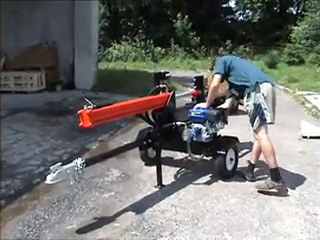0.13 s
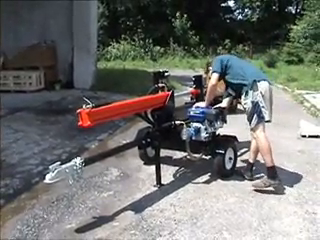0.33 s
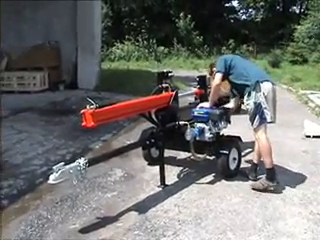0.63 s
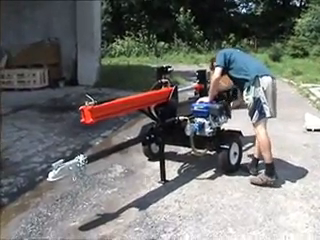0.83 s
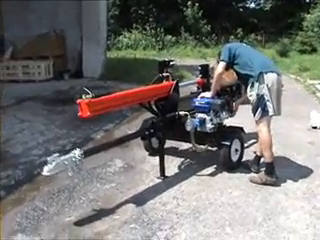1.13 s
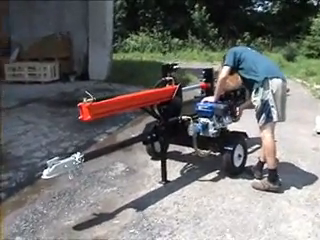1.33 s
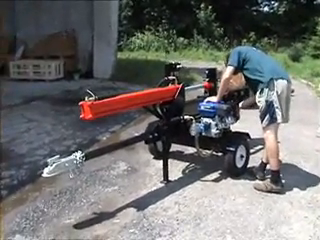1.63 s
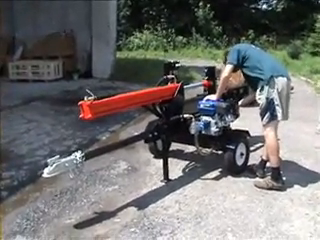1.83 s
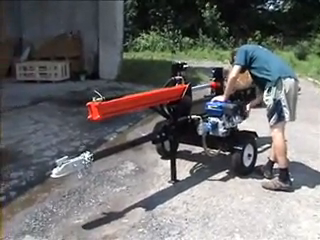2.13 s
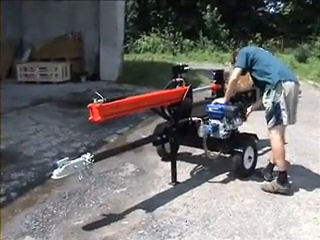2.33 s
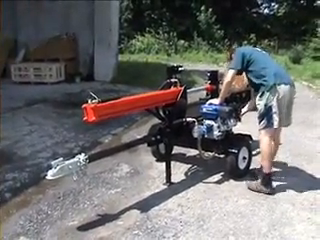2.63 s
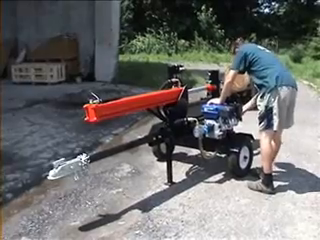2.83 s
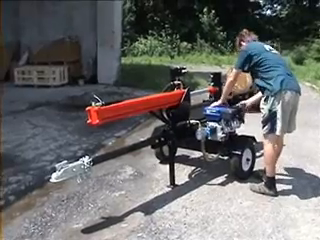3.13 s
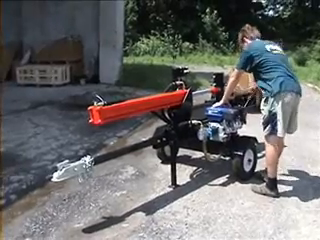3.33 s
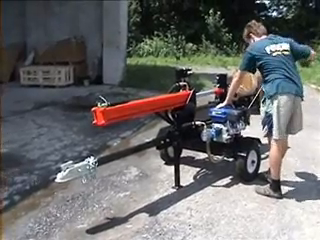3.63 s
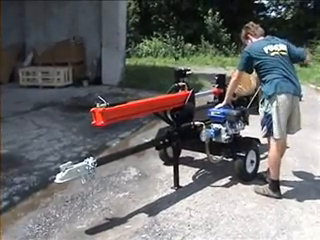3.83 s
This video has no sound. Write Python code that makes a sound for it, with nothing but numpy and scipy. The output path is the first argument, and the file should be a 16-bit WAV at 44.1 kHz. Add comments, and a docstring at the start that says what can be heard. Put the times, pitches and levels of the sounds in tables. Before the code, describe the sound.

A small petrol engine is handled with light metallic knocks while shoes crunch on gravel and birds chirp; then the starter rope is pulled, whirring and clattering. Open yard, microphone a few metres away, light wind.

```python
"""In a gravel yard, the microphone a few metres from a small petrol engine: light wind buffets the
microphone over the outdoor hush, and the controls knock and ping. Birds then call from the trees, as
enveloped sine glides, and shoes grind on grit, as dense grains and snapping stones. Near 2.9 s the rope
pulls: the reel whirs as rough coloured noise, and from 3.2 s the starter pawls slam in and the engine
clatters round in noise bursts, low thuds and frame rings. It does not catch yet."""
import sys
import numpy as np
from scipy import signal
from scipy.fft import rfft, irfft
from scipy.io import wavfile
from scipy.ndimage import uniform_filter1d

SR = 44100
rng = np.random.default_rng(int(sys.argv[2]) if len(sys.argv) > 2 else 0)


def generate_wav(sig):
    """Save sig (samples, or channels by samples) to the path in sys.argv[1] as 16-bit PCM at SR."""
    pcm = np.round(np.clip(np.atleast_2d(sig).T, -1, 1) * 32767).astype(np.int16)
    wavfile.write(sys.argv[1], SR, pcm)


N = 176400
T = np.arange(N) / SR  # time in s
OPPOSED = np.array([[1], [-1]])  # left against right


def undb(db):
    """Decibels to amplitude gain."""
    return 10 ** (np.asarray(db) / 20)


def unit(x):
    """Scale to rms 1."""
    return x / np.sqrt(np.mean(x ** 2) + 1e-20)


def on_bins(points):
    """Join (f/Hz, value) points on a log-frequency axis."""
    hz, value = np.array(points, float).T
    bin_hz = np.arange(N // 2 + 1) * SR / N
    return np.interp(np.log(bin_hz + 1e-3), np.log(hz), value)


def colour(x, points):
    """Causal filter through (f/Hz, level/dB) points that keeps the power of white noise."""
    # folding the cepstrum forward in time gives minimum phase
    cepstrum = irfft(np.log(unit(undb(on_bins(points)))), N)
    cepstrum[1:N // 2] *= 2
    cepstrum[N // 2 + 1:] = 0
    return irfft(rfft(x) * np.exp(rfft(cepstrum)), N)


# stereo width heard at the microphone: f/Hz, side over mid [gain]
WIDTH = [(60, 0.36), (250, 0.065), (1000, 0.11), (2500, 0.39), (8000, 0.48)]


def spread(pair):
    """Mix two unrelated signals to left and right, with width set by frequency."""
    side = irfft(rfft(pair[1]) * on_bins(WIDTH), N)
    return np.array([pair[0] + side, pair[0] - side])


def noise():
    """Two unrelated white noises."""
    return rng.standard_normal((2, N))


def walk(hz):
    """Smoothed random drift of rms 1, with a new random value hz times a second."""
    step = max(int(SR / hz), 1)
    held = rng.standard_normal(N)[np.arange(N) // step]
    return unit(uniform_filter1d(held, step))


def fade(t, t60):
    """Exponential decay from time 0, down 60 dB after t60 seconds."""
    return (t >= 0) * np.exp(-np.log(1000) * np.clip(t / t60, 0, 10))


def swell(start, length):
    """A rounded rise and fall."""
    return np.sin(np.pi * np.clip((T - start) / length, 0, 1))


def echo(x, t60, points):
    """Diffuse stereo reflections: decaying coloured noise of unit energy, 8 ms behind the source."""
    tail = colour(noise(), points) * fade(T - .008, t60)
    return signal.fftconvolve(x[None], unit(tail) / np.sqrt(N), axes=1)[:, :N]


def ring(start, hz, db, t60, rise):
    """One struck mode: a sine that rises quickly and dies away."""
    out = np.zeros(N)
    i = int(start * SR)
    t = T[:min(N // 10, N - i)]
    envelope = undb(db) * np.minimum(t / rise, 1) * fade(t, t60)
    out[i:i + len(t)] = envelope * np.sin(2 * np.pi * hz * t)
    return out


# gusts at the microphone: t/s, length/s, level/dB at the crest
GUSTS = [(-.05, 0.14, -43.5), (0.08, 0.11, -32.5), (0.185, 0.24, -54), (0.554, .10, -47), (1.55, 0.18, -45),
         (1.719, 0.15, -38), (1.828, 0.14, -53), (2.04, 0.31, -47.5), (2.24, 0.52, -50), (2.68, 0.32, -52)]
# spectrum of the buffets: f/Hz, level/dB
WIND_COLOUR = [(12, -20), (35, 4.5), (70, 2.5), (120, -1.5), (220, -13.5), (500, -76), (2000, -101)]
WIND_OPPOSED = 0.28  # share of each port's noise taken from the other


def wind():
    """Turbulent pressure on the microphone: low noise whose two ports are partly opposed."""
    ports = noise()
    buffets = colour(unit(ports - WIND_OPPOSED * ports[::-1]), WIND_COLOUR)
    strength = sum(undb(db) * swell(start, length) ** 2 for start, length, db in GUSTS)
    return buffets * strength


# spectrum of the outdoor hush: f/Hz, level/dB
AIR_COLOUR = [(20, -8.5), (60, -3.5), (140, -12.5), (400, -9.5), (540, -5), (700, -10.5), (950, -7),
              (1800, -14), (4000, -17), (7000, -23), (11000, -27.5), (15500, -33.5)]
AIR_GAIN_DB, AIR_WIDTH = -55, 1
# faint whine: f/Hz, level/dB
WHINE = [(6700, -68.5), (8950, -71.5), (11730, -70)]


def air():
    """Outdoor hush as slightly drifting coloured noise, with thin wavering sine tones on top."""
    hush = colour(spread(noise()) + AIR_WIDTH * noise(), AIR_COLOUR)
    hush = hush * undb(AIR_GAIN_DB + 0.23 * walk(7))
    whine = 0
    for hz, db in WHINE:
        angle = 2 * np.pi * np.cumsum(hz + 45 * walk(300)) / SR
        whine = whine + undb(db) * np.sin(angle)
    return hush + whine


# knocks of controls, pawls and valve gear, before the housing:
# t/s, rise/s, thump level/dB, casing level/dB, clank level/dB, treble level/dB
KNOCKS = [(0.016, 0.0014, -50.5, -48, -36.5, -44.5), (0.341, 0.0031, -60, -28.5, -35.5, -49),
          (.556, 0.0036, -82, -37.5, -31.5, -34), (1.324, 0.0065, -42, -34, -51, -71),
          (1.345, 0.0078, -43, -41.5, -47, -68), (1.376, 0.0016, -43, -35, -27.5, -40.5),
          (1.87, 0.0044, -62, -38, -45, -62), (1.89, 0.0053, -64, -43, -39, -63),
          (2.642, 0.0042, -45, -48, -43, -41), (2.683, 0.0028, -39.5, -44, -56, -56),
          (2.77, 0.0015, -58, -35.5, -41, -37), (2.800, 0.0017, -41.5, -41.5, -37.5, -56),
          (2.881, 0.0057, -49.5, -40.5, -39.5, -48), (2.94, .012, -57, -33.5, -38.5, -43),
          (2.987, 0.0085, -43, -44, -40, -41.5), (3.087, 0.0035, -40.5, -30.5, -38.5, -71),
          (3.228, .003, -42, -23, -33, -56), (3.233, 0.0096, -34, -21.5, -20, -20),
          (3.253, .002, -49, -20, -35, -33), (3.266, 0.0021, -29.5, -14, -21, -15),
          (3.326, 0.0027, -45, -31, -38, -57), (3.472, 0.0011, -52, -29.5, -34, -54),
          (3.512, .005, -52, -35, -31.5, -58), (3.569, 0.0011, -54, -28, -32.5, -28),
          (3.662, 0.0035, -45, -29.5, -50, -28.5), (3.707, 0.0078, -38.5, -27, -38.5, -64),
          (3.822, 0.0022, -53, -31, -33, -54), (3.871, 0.008, -39, -31.5, -36.5, -29),
          (3.938, 0.0049, -58, -37, -34.5, -62), (3.952, 0.0033, -56, -42, -29, -30.5)]
# spectra of the four parts of a knock, low to high: f/Hz, level/dB
THUMP = [(40, -32), (90, -8), (150, -8.5), (240, -1), (320, -2.5), (450, 5), (900, -32)]
CASING = [(150, -33.5), (330, -11.5), (480, -11), (640, -4), (800, -2.5), (960, 1.5), (1150, 1),
          (1500, -11), (2300, -49), (5000, -40.5)]
CLANK = [(700, -65), (1300, 6.5), (2050, 3.5), (2400, 4.5), (2850, 2), (3500, 1), (4300, -6), (7000, -37.5)]
TREBLE = [(2200, -10.5), (4200, 0.5), (6500, -1), (7200, -0.5), (8100, -0.5), (9200, -1.5), (11000, -10),
          (13000, -4.5), (16000, -20)]
THUMP_T60_S, CASING_T60_S, CLANK_T60_S, TREBLE_T60_S = 0.091, 0.069, 0.054, 0.046


def knocks():
    """Loose parts chatter into contact: noise in four regions, each dying at its own rate."""
    out = 0
    parts = [(THUMP, THUMP_T60_S), (CASING, CASING_T60_S), (CLANK, CLANK_T60_S), (TREBLE, TREBLE_T60_S)]
    t = T[:N // 10]
    for k, (points, t60) in enumerate(parts):
        power = np.zeros(N)  # overlapping knocks add as power
        for start, rise, *dbs in KNOCKS:
            i = max(int(start * SR), 0)
            decay = fade(np.maximum(t - rise, 0), t60)
            shape = undb(dbs[k]) * np.minimum(t / rise, 1) * decay
            power[i:i + len(t)] += shape[:N - i] ** 2
        out = out + colour(spread(noise()) * np.sqrt(power), points)
    return out


# narrow resonances of the starter cover and housing: f/Hz, width/Hz, added gain
RESONANCES = [(234.5, 49, 0.53), (427, 15, 0.29), (515, 28, 0.58), (948, 35, 0.58), (1157, 75, 0.31),
              (1486, 38, 0.89), (1809, 35, 0.43), (2050, 21, 1.25), (2457, 35, 0.2), (2777, 44, 0.73),
              (3480, 23, 1.04), (4160, 23, 0.24), (5560, 74, 0.73), (6630, 39, 1.4), (7670, 75, 0.6),
              (8200, 65, 0.99), (10340, 180, .8)]
BROAD_GAIN = 0.8


def housing(x):
    """The cover and housing ring at their own pitches whatever rubs or hits them."""
    out = BROAD_GAIN * x
    for hz, width, gain in RESONANCES:
        b, a = signal.iirpeak(hz, hz / width, fs=SR)
        out = out + gain * signal.lfilter(b, a, x)
    return out


# spectrum of the reflections, also used for the trees: f/Hz, level/dB
YARD_COLOUR = [(100, 3), (600, 4), (1500, 4.5), (4000, 4.5), (9000, 0.5), (16000, -7)]
YARD_DB, YARD_T60_S, YARD_WIDTH = -15.5, 0.51, 0.68


def yard(near):
    """The yard returns diffuse reflections of the near sounds."""
    mid, side = echo(near.mean(axis=0), YARD_T60_S, YARD_COLOUR)
    return undb(YARD_DB) * (mid + YARD_WIDTH * side * OPPOSED)


# levers and small steel parts pinging as they are knocked: t/s, f/Hz, level/dB, t60/s
PINGS = [(.018, 2355, -30, 0.026), (.018, 3520, -48, 0.033), (.341, 985, -27.5, 0.039),
         (.558, 938, -36, 0.092), (.558, 3346, -30.5, 0.03), (1.377, 850, -31.5, 0.074),
         (2.946, 1006, -33, 0.13), (3.2665, 8050, -15.5, 0.032), (3.475, 1030, -25, .05),
         (3.822, 1050, -33, 0.046), (3.873, 8220, -26, 0.058), (3.88, 5500, -44.5, 0.36)]
PING_RISE_S = 0.001


def pings():
    """Each small steel part is a struck mode that rings briefly at its own pitch."""
    return sum(ring(start, hz, db, t60, PING_RISE_S) for start, hz, db, t60 in PINGS)


# bird notes, thin held whistles and trilled slurs, before the direct gain and trees:
# t/s, length/s, start f/Hz, end f/Hz, level/dB, trill depth [share of pitch]
CALLS = [(0.376, 0.053, 5360, 5350, -59, 0.0092), (0.47, 0.077, 4290, 4310, -51.5, 0.018),
         (0.838, 0.053, 3980, 4240, -46.5, 0.075), (.865, 0.13, 3510, 2838, -43.5, 0.12),
         (1.376, .08, 5650, 5460, -49, 0.018), (1.45, 0.09, 5080, 4300, -46, 0.085),
         (2.032, 0.034, 4670, 4770, -41.5, 0.122), (2.036, 0.086, 5550, 5550, -51.5, 0.0082),
         (2.127, 0.087, 4750, 4170, -47, .1), (2.49, 0.044, 5250, 5740, -53, .03),
         (2.501, 0.058, 3740, 4320, -46.5, 0.12), (2.532, .095, 3637, 2886, -43, 0.12),
         (3.6, 0.11, 5570, 5330, -48.5, .015), (3.673, .1, 5000, 4490, -47.5, .06)]
TRILL_HZ, WAVER_DEPTH = 57.3, .022  # mean trill rate; waver as a share of pitch
BIRD_DIRECT_DB, OCTAVE_DB, TREES_T60_S = -0.5, -15, 0.57


def birds():
    """Gliding sines with an octave partial, trilled and wavering, smeared by the trees."""
    song = np.zeros(N)
    trill = np.sin(2 * np.pi * np.cumsum(TRILL_HZ * (1 + .2 * walk(30))) / SR)
    waver = WAVER_DEPTH * walk(400)
    for start, length, start_hz, end_hz, db, depth in CALLS:
        glide = start_hz * (end_hz / start_hz) ** np.clip((T - start) / length, 0, 1)
        angle = 2 * np.pi * np.cumsum(glide * (1 + depth * trill + waver)) / SR
        voice = np.sin(angle) + undb(OCTAVE_DB) * np.sin(2 * angle)
        song += undb(db) * np.sqrt(np.abs(swell(start, length))) * voice
    return undb(BIRD_DIRECT_DB) * song + echo(song, TREES_T60_S, YARD_COLOUR)


# soles grinding on grit: t/s, length/s, level/dB at the crest
SCUFFS = [(0.453, 0.05, -48), (0.562, 0.16, -52.5), (0.739, .05, -46), (1.161, 0.051, -46.5),
          (1.36, 0.49, -47.5), (1.638, 0.13, -45), (1.793, 0.21, -51), (1.965, 0.063, -42.5),
          (2.58, 0.17, -46), (2.73, .12, -50)]
# spectrum of the crunch: f/Hz, level/dB
GRIT_COLOUR = [(120, -12.5), (500, -4.5), (1400, 12), (2600, 7), (4500, 6), (7000, 2), (10000, -4.5),
               (16000, -12.5)]
GRIT_PER_S, GRIT_SPREAD_DB = 2500, 3.5  # grain rate; scale of the exponential spread in level
# single stones snapping under a shoe: t/s, level/dB of the ping, f/Hz
STONES = [(0.6471, -20.5, 2660), (0.759, -47, 4500), (0.9785, -20, 2420), (1.1764, -34, 3300),
          (1.181, -20.5, 3160), (1.2206, -22, 6860), (1.2473, -26.5, 5780), (1.4544, -26, 1900),
          (1.466, -22.5, 2630), (1.478, -20.5, 3080), (1.518, -26, 3500), (1.581, -23, 3020),
          (1.587, -37, 2020), (1.660, -24, 3570), (1.6945, -33, 4650), (1.710, -16.5, 3200),
          (1.717, -24, 2950), (1.748, -23, 4600), (1.7819, -24, 1870), (1.843, -25, 7260),
          (1.9109, -20.5, 4536), (1.998, -21.5, 3400), (2.001, -22, 4500), (2.646, -29, 4100),
          (2.682, -33, 1500), (2.7247, -20.5, 3000), (2.728, -22, 1950), (2.7611, -19.5, 3340),
          (2.780, -27, 3000), (2.915, -27, 2320)]
STONE_T60_CYCLES = 7.5
CRACK_DB, CRACK_T60_S = -17.5, 0.014  # gain relative to the ping


def gravel():
    """Dense random grains crunch under the soles; each stone is a short ping with a noisy crack."""
    hits = rng.random((2, N)) < GRIT_PER_S / SR
    extra_db = GRIT_SPREAD_DB * np.minimum(rng.exponential(size=(2, N)), 5)
    grains = hits * undb(extra_db) * np.sign(noise())
    pressure = sum(undb(db) * swell(start, length) for start, length, db in SCUFFS)
    out = colour(spread(unit(grains)) * pressure, GRIT_COLOUR)
    t = T[:N // 100]
    for start, db, hz in STONES:
        shared, *sides = rng.standard_normal((3, len(t)))
        band_hz = [.5 * hz, min(3 * hz, 15000)]
        band = signal.butter(1, band_hz, "band", fs=SR, output="sos")
        crack = signal.sosfilt(band, shared + .5 * np.array(sides)) * fade(t, CRACK_T60_S)
        ping = np.sin(2 * np.pi * hz * t) * fade(t, STONE_T60_CYCLES / hz)
        i = int(start * SR)
        out[:, i:i + len(t)] += undb(db) * (ping + undb(CRACK_DB) * crack)
    return out


# the reel's rubbing, before the housing: t/s, level/dB
REEL = [(2.91, -46), (2.95, -38.5), (3.02, -41.5), (3.10, -42.5), (3.14, -53), (3.22, -56), (3.25, -32),
        (3.33, -42.5), (3.45, -37.5), (3.532, -30), (3.64, -33.5), (3.73, -37.5), (3.78, -40),
        (3.86, -39.5), (3.91, -33.5), (4.0, -34.5)]
# spectrum of the rubbing: f/Hz, level/dB
REEL_COLOUR = [(60, -25), (220, -14), (330, -13), (500, -10), (650, -6), (850, 2), (1150, -3), (1500, -7),
               (2000, -14), (3300, -19), (6000, -22.5), (8300, -25), (11000, -30.5), (16000, -37)]
REEL_RUB_HZ, REEL_ROUGH_DB = 107.4, 1.5  # rate and rms of the unevenness
REEL_TAPS_PER_S, RUB_GAIN, CHATTER_GAIN = 260, 0.84, 0.38 * 0.55


def reel():
    """Rope and reel rub as noise and chatter as random taps, unevenly, in the starter's tin cover."""
    t, db = np.array(REEL).T
    drive = undb(np.interp(T, t, db, left=-120) + REEL_ROUGH_DB * walk(REEL_RUB_HZ))
    taps = noise() * (rng.random(N) < REEL_TAPS_PER_S / SR)
    chatter = unit(colour(taps, [(100, -2), (1500, -6), (4000, -4), (12000, -22)]))
    rubbing = spread(RUB_GAIN * noise() + CHATTER_GAIN * chatter)
    return colour(rubbing * drive, REEL_COLOUR)


# dull thuds as the engine rocks on its mounts: t/s, f/Hz, level/dB
THUDS = [(3.238, 277, -32), (3.267, 312, -24.5), (3.570, 165, -32), (3.568, 94, -37.5), (3.66, 210, -35.5),
         (3.706, 117, -28.5), (3.711, 230, -38), (3.873, 225, -26)]
THUD_RISE_S, THUD_T60_S = 0.0066, 0.07


def thuds():
    """Each thud is a few low cycles of the engine on its mounts."""
    return sum(ring(start, hz, db, THUD_T60_S, THUD_RISE_S) for start, hz, db in THUDS)


# modes of the housing and frame: f/Hz, level/dB relative to the blow, t60/s
MODES = [(240, -10, 0.18), (440, -4.5, 0.49), (484, -9, 1), (536, -3.5, 0.73), (658, -6.5, 1),
         (688, -8.5, 0.65), (804, 1.5, 0.69), (944, -11, .27), (934, 0, 0.15), (1080, -18, .2),
         (2030, -2, 0.13), (2870, -14, 0.18), (5560, -11, 0.12), (8400, -10, 0.17)]
# blows hard enough to set the frame ringing: t/s, level/dB
RINGS = [(3.239, -34.5), (3.268, -30.5), (3.874, -43)]
FRAME_ROUGH = 0.35  # the shaking frame makes its rings flutter


def frame():
    """Housing and frame modes ring on as decaying, fluttering sines after the hardest blows."""
    out = np.zeros((2, N))
    t = T[:N // 4]
    for hz, mode_db, t60 in MODES:
        flutter = 1 + FRAME_ROUGH * walk(45)
        for start, db in RINGS:
            i = int(start * SR)
            phase, lag = rng.standard_normal(2)
            angle = 2 * np.pi * (hz * t + phase) + 0.14 * lag * OPPOSED
            tone = undb(db + mode_db) * fade(t, t60) * np.sin(angle)
            out[:, i:i + len(t)] += tone[:, :N - i] * flutter[i:i + len(t)]
    return out


def scene():
    """Machine and shoes in the yard, with birds, wind and air around them."""
    machine = housing(knocks() + reel()) + thuds() + pings() + frame()
    near = machine + gravel()
    return near + yard(near) + birds() + wind() + air()


TOP_HZ = 15700


def record(dry):
    """The recorder cuts the top with a steep elliptic low-pass."""
    low_pass = signal.ellip(8, .2, 70, TOP_HZ, fs=SR, output="sos")
    return signal.sosfilt(low_pass, dry)


dry = scene()
out = record(dry)
generate_wav(out)
```